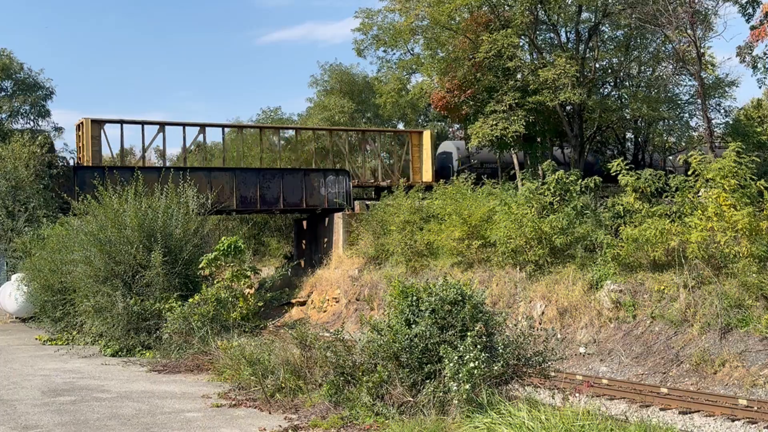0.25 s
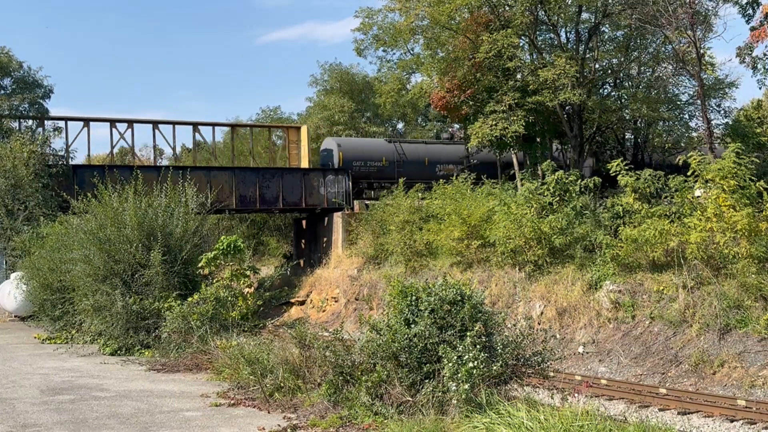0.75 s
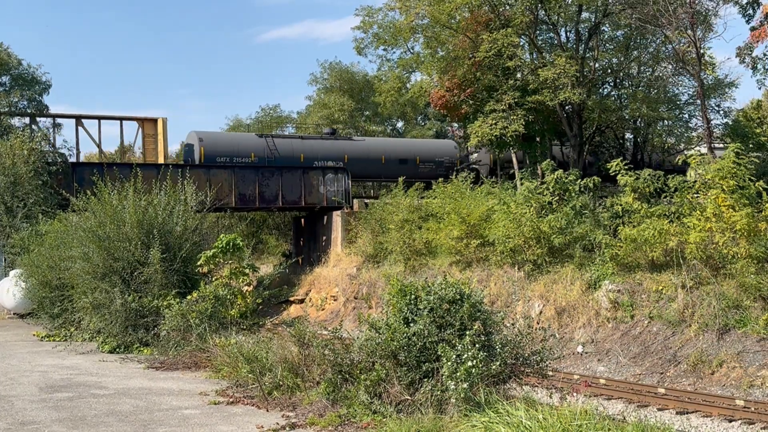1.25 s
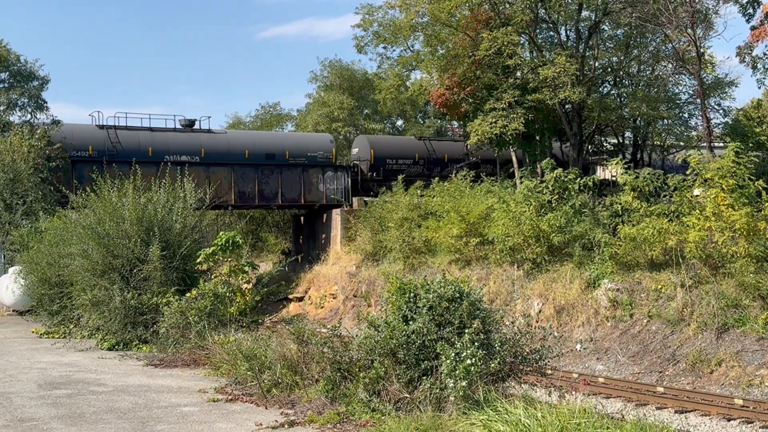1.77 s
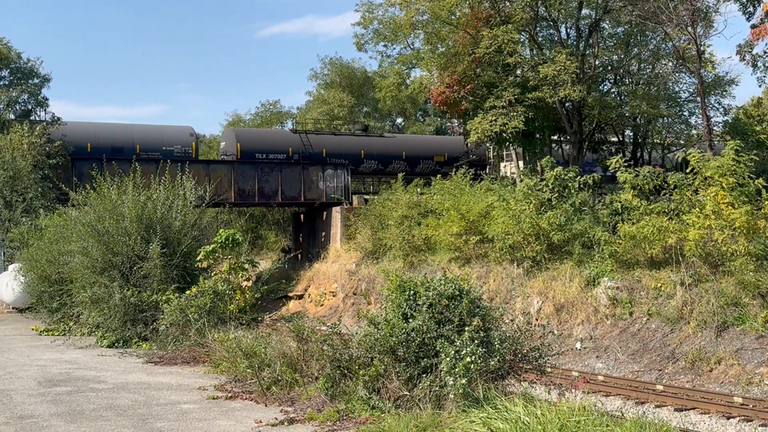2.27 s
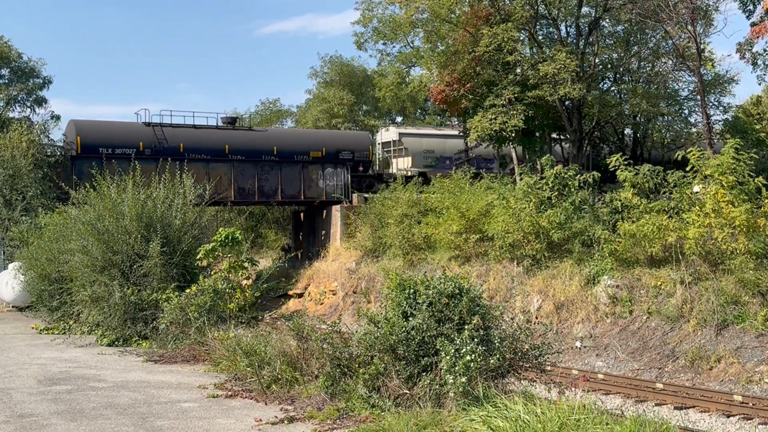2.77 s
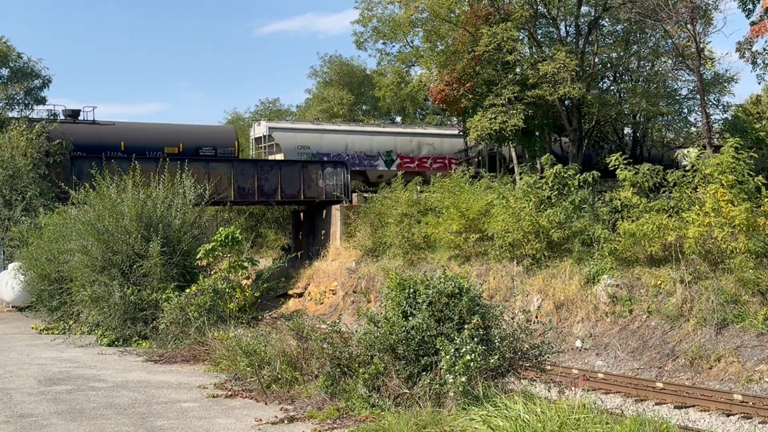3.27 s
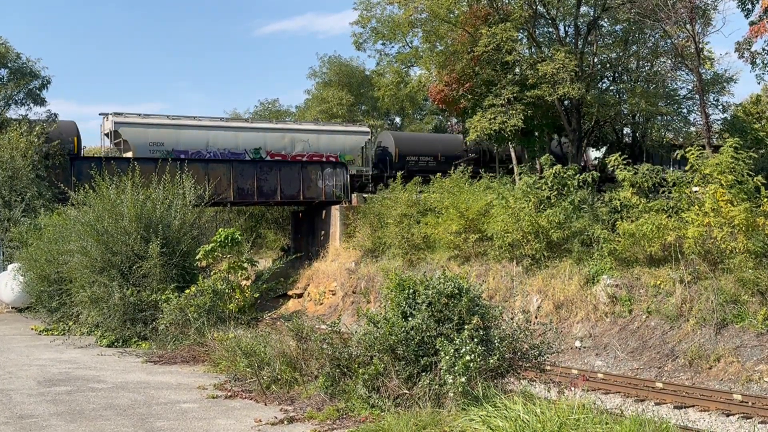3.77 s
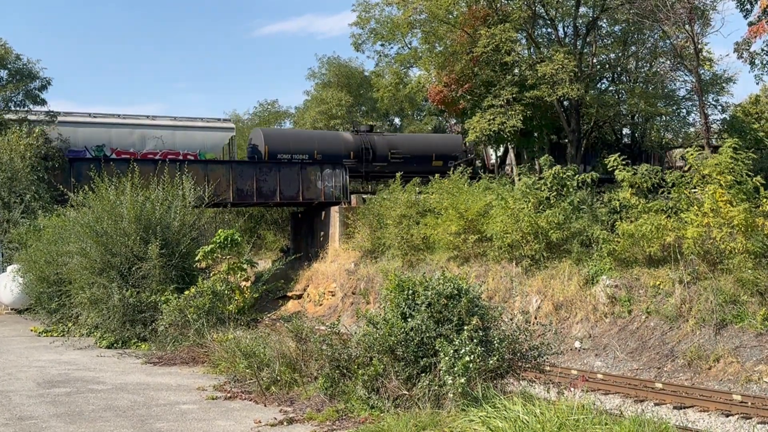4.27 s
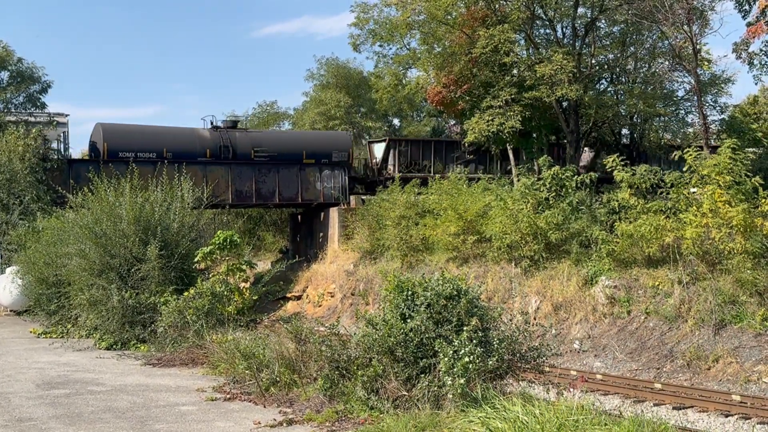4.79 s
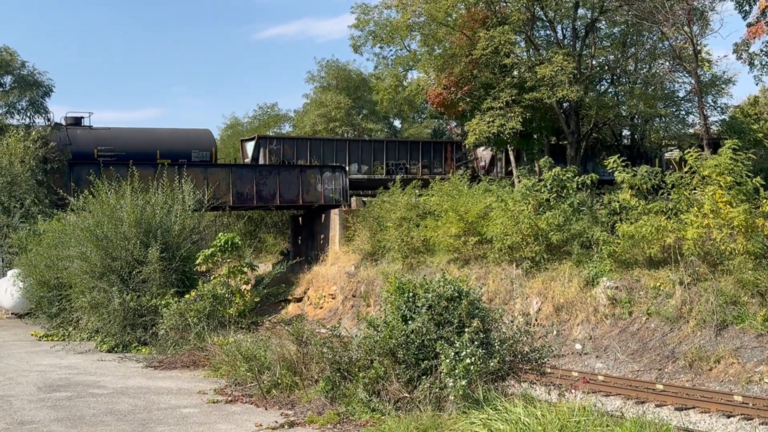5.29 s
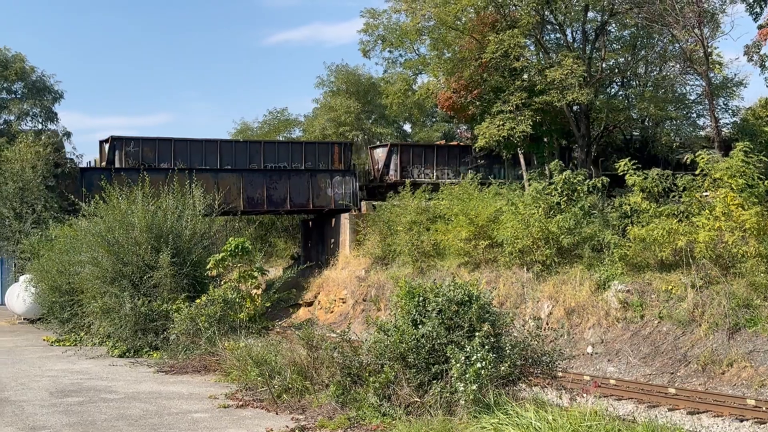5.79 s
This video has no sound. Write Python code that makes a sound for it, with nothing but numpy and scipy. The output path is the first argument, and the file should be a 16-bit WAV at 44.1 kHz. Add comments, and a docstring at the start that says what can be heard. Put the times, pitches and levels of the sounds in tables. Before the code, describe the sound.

Loud, deep boom and roar of freight wagons crossing a steel bridge, with early wheel-flat slams, brief squeals, hollow howls and an approaching engine.

```python
"""Heard in stereo outdoors below the embankment, freight wagons cross a steel girder bridge.
From the start, noise-driven deck, girders, wagon bodies and rails boom, drum and roar; joints thump, wheels clack.
Wheel flats slam early on and again near the end; brief tonal squeals sound in the first 1.4 s and after 4.7 s.
From 1.35 s a girder mode hums, a wavering near-pure tone; after 3.7 s wagons howl in bursts of tonal noise.
A diesel drone, orders of one firing cycle, draws nearer, and its hissing intake emerges late."""
import sys
import numpy as np
from scipy import signal
from scipy.fft import rfft, irfft, next_fast_len
from scipy.io import wavfile
from scipy.ndimage import uniform_filter1d, map_coordinates

SR = 44100
rng = np.random.default_rng(int(sys.argv[2]) if len(sys.argv) > 2 else 0)


def materialize(psi):
    """Save the field psi as 16-bit PCM at rate SR to the path in sys.argv[1].

    A 1-D psi becomes a single channel; in a 2-D psi each row is a channel.
    """
    bounded = np.clip(np.atleast_2d(psi).T, -1, 1)
    quanta = np.round(bounded * 32767).astype(np.int16)
    wavfile.write(sys.argv[1], SR, quanta)


def volts(x):
    """Linear amplitude factor 10**(x/20) for a level x in dB, scalar or array-like."""
    e = np.asarray(x, float) / 20
    return 10 ** e


N = 266364

# radiated colours, relative density: frequency_hz, density_db (per Hz)
DECK_COLOUR = [(15, -40), (25, -3), (60, 1), (108, -1.5), (135, -3), (180, -30.5), (300, -120)]
GIRDER_WEB_COLOUR = [(71, -41.5), (120, -11), (156, 0), (183, -1.5), (237, -2.5), (300, -19), (390, -39),
                     (660, -120)]
WAGON_BODY_COLOUR = [(160, -26), (270, -1), (436, 0), (527, -3.5), (571, -4), (606, -5), (820, -18),
                     (1070, -43.5), (1800, -120)]
RAIL_COLOUR = [(450, -27.5), (760, -0.5), (805, -7), (974, -2.5), (1130, -7), (1360, -9), (1480, -5.5),
               (1680, -9.5), (1900, -9), (2130, -12), (2520, -9.5), (2880, -13.5), (3140, -12), (3600, -18),
               (3920, -15), (4150, -18), (5780, -23.5), (7400, -29.5), (9620, -40.5), (16300, -120)]
FLANGE_COLOUR = [(4180, -34), (7100, -4), (7710, 0), (9080, -2), (10700, -13), (12700, -17), (14400, -27),
                 (15100, -33)]
INTAKE_COLOUR = [(9000, -40), (11500, -9.5), (14000, -1.5), (15100, -2.5), (15300, -43.5)]  # air hiss of the engine's intake
# wheels thumping over joints: start_s, relative level_db, pitch_hz
THUMPS = [(0.2, -7.5, 121.4), (0.21, -8.5, 182), (0.319, -10.5, 201), (0.371, -3.5, 201), (0.58, -9, 100.3),
          (0.685, -3.5, 116), (0.722, -5, 136), (0.772, -8, 182.4), (0.786, -5, 96.5), (0.839, -5, 73.3),
          (0.868, -6.5, 98), (0.943, -9.5, 72.4), (1.019, -4, 171.6), (1.056, -7.5, 90), (1.11, -8.5, 163),
          (1.135, -5, 95.7), (1.169, -6.5, 232.5), (1.195, -6.5, 110), (1.232, -6, 150), (1.25, -12, 88),
          (1.292, -4.5, 100.4), (1.32, -3, 181), (1.39, -10, 117.6), (1.468, -6.5, 185), (1.53, -5, 172),
          (1.601, -7, 218), (1.56, -6.5, 164.7), (1.7, -5.5, 190), (1.785, -3.5, 206), (1.839, -8, 150),
          (1.865, -10, 119.5), (1.957, -6.5, 191.6), (2.047, -9, 178.4), (2.214, -6, 176),
          (2.244, -9.5, 124), (2.283, -2.5, 183), (2.36, -11, 177), (2.417, -5.5, 173.5), (2.468, -14, 178),
          (2.514, -10, 194), (2.569, -10, 165.4), (2.62, -11.5, 201), (2.717, -5.5, 172.6),
          (2.751, -8, 190), (2.779, -3.5, 180), (2.8, -15, 110), (2.876, -10, 179), (2.951, -8.5, 183),
          (3.11, -10.5, 147), (3.129, -16.5, 71.5), (3.22, -12.5, 95.5), (3.329, -12.5, 91),
          (3.439, -8.5, 190), (3.52, -13, 101.6), (3.86, -9.5, 190), (4.01, -12.5, 186), (4.19, -9, 95),
          (4.73, -12.5, 91), (5.049, -11, 200), (5.209, -7.5, 192), (5.501, -9.5, 164), (5.425, -10, 86),
          (5.545, -10, 79.3), (5.639, -5.5, 176.6), (6, -4.5, 100.7)]
# wheel flats slamming the rail: start_s, relative level_db
SLAMS = [(0.685, -5.5), (0.724, -4.5), (0.791, -13.5), (0.871, -12.5), (1.026, -3), (1.061, -0.5),
         (1.172, -7.5), (1.216, -8), (5.49, -11.5), (5.525, -11), (5.547, -8.5), (5.636, -13.5),
         (5.69, -10.5), (5.76, -6)]
# the deck's short answer to a slam: frequency_hz, relative level_db, t60_s
PLATE_MODES = [(190, -4.5, 0.039), (313, 1, 0.032), (430, -0.5, 0.028), (580, -3.5, 0.036),
               (910, -16.5, .02)]
# wheel clacks: start_s, relative level_db
CLACKS = [(0.075, -18.5), (0.1749, -17.5), (0.199, -24.5), (0.232, -12), (0.274, -22), (0.3082, -24),
          (0.35, -23.5), (0.39, -10), (0.432, -16.5), (0.521, -18.5), (0.555, -21.5), (0.6339, -19),
          (2.574, -15), (3.924, -22), (4.3023, -23), (4.776, -23), (4.941, -22.5), (5.16, -24.5),
          (5.478, -20.5), (5.5472, -20), (5.636, -23), (5.68, -23), (5.7, -21), (5.72, -20), (5.754, -19),
          (6.001, -20)]
# what a clack rings with: frequency_hz, relative level_db, t60_s
WHEEL_MODES = [(1301, -1, 0.087), (1514, -1, 0.12), (1868, 1.5, 0.066), (2594, -1, 0.095), (3493, -4, 0.15),
               (4240, -8, 0.017), (5550, -10.5, 0.088)]
# steel modes singing under the rolling: frequency_hz, width_hz, level_db (rms before it follows the load)
SINGING_MODES = [(862.5, 12, -45), (658, 20, -40)]
# diesel drone: time_s, firing_cycle_hz, relative level_db
DIESEL_COURSE = [(0, 29.42, -39.5), (2.5, 29.94, -36.5), (3.5, 29.82, -30.5), (4.5, 29.74, -28.5),
                 (5.5, 29.62, -27.5), (6.04, 29.8, -24.5)]
# drone partials: multiple of the firing cycle, relative level_db
DIESEL_ORDERS = [(2, -7.5), (3, -5), (4, 1.5), (5, -11.5), (6, -10)]
# intake hiss as the engine nears: time_s, level_db (rms)
INTAKE_COURSE = [(0, -88.5), (4, -81.5), (5, -70.5), (5.5, -66.5), (5.85, -61.5), (6.04, -60)]
# stereo image by frequency: frequency_hz, left_minus_right_db, left_lead_rad, likeness of the channels (0-1)
STEREO_IMAGE = [(40, .2, .12, .95), (110, .8, .15, .91), (170, 1.9, .32, .92), (240, 2.1, .22, .94),
                (300, 1.1, .25, .9), (400, 1.5, .14, .96), (500, 3.5, .35, .86), (600, 5.2, -.04, .8),
                (800, 6.9, -.53, .54), (1000, 4.5, -.68, .76), (1300, 1.5, -.74, .9),
                (1500, -.7, -.49, .97), (1750, -.9, -.23, .97), (1880, 0, 0, 1), (2300, 0, .03, 1),
                (2500, -.3, .34, .98), (3000, 0, .53, .97), (4000, .2, .5, .95), (4900, .1, .3, .94),
                (5250, 0, 0, 1), (6800, 0, 0, 1), (7150, 0, 1.1, .85), (7600, 0, 3.1, 1),
                (9550, 0, 3.14, 1), (9650, 0, 2.6, 0.75), (10700, 0, 2.7, 0.7), (13400, 0, 1, .5),
                (15000, 0, 1.5, .65)]
# spells of near-pure girder hum: start_s, end_s (middles of the fades), pitch_hz, level_db (rms before throbbing)
HUM_SPELLS = [(1.35, 1.95, 572, -32), (1.95, 2.35, 571, -35), (2.35, 2.82, 570.5, -32.5),
              (2.82, 3.35, 571, -39), (3.35, 3.8, 570, -35.5), (3.8, 5.05, 568, -31.5),
              (5.05, 5.3, 568, -29.5), (5.4, 5.65, 568, -29.5), (5.75, 6.1, 569, -33.5)]
# howls of hollow wagons: centre_s, length_s, centre pitch_hz, relative level_db
HOWLS = [(3.903, 0.38, 411.6, -21), (4.196, 0.22, 430, -23.5), (4.752, 0.51, 430.7, -23.5),
         (5.394, 0.19, 520.5, -25), (5.506, 0.51, 414.2, -24), (5.764, 0.24, 430.6, -20.5),
         (6.001, 0.23, 407, -25)]
# short flange squeals: start_s (middle of the onset), relative level_db, pitch_hz, length_s
SQUEALS = [(.225, -39, 1850, 0.1), (.39, -41, 2520, .07), (1.29, -43, 2500, .07), (4.73, -42, 1490, .04),
           (4.93, -37.5, 1958, 0.1), (5.39, -45, 2550, .07)]
# how hard the wheels shake the span: time_s, relative level_db
SHAKE_COURSE = [(0.0, -14.5), (0.05, -13), (0.13, -19.5), (0.2, -14.5), (0.52, -15.5), (0.87, -10.5),
                (0.93, -15), (1.16, -11.5), (1.44, -16), (1.46, -15.5), (2.1, -18), (2.19, -17.5),
                (2.24, -18.5), (2.37, -18.5), (2.69, -17.5), (2.79, -19.5), (2.82, -19.5), (4.19, -17),
                (4.27, -18), (5.99, -13), (6.01, -10), (6.04, -13.5)]
# loads taking over the span: arrival_s (middle of handover), deck_db, web_db, body_db over the shaking
WAGONS = [(0, -4, -3.5, -5.5), (.6, -5.5, -8, -8), (1.42, -9, -5.5, -8.5), (2.1, -11.5, -5.5, -7.5),
          (3.05, -4, -3, -6.5), (3.75, -5, -6.5, -6.5), (4.25, -6, -7, -5), (5.3, -5, -7.5, -5.5)]
# bogies swelling the rail roar: centre_s, length_s, roar_db, brightness_db
BOGIES = [(0.098, 0.057, 6, -3), (0.382, 0.8, 2.5, 0.5), (1.092, 0.24, 0.5, 0), (1.397, 0.45, 1, 0),
          (2.277, 0.28, -1.5, 4), (2.604, 0.79, 3, -2), (3.422, 0.74, 2, 1), (3.714, 0.23, 1, -0.5),
          (3.947, 0.31, 3, -1), (4.5, 1, 1, 1.5), (5.002, 0.35, 0.5, 2), (5.718, 0.77, 2.5, 0.5),
          (5.735, 0.17, 2, -3), (6.0, 0.67, -0.5, 2)]
# flanges rubbing the rail head: centre_s, length_s, level_db over the steady hiss
RUBS = [(0.603, 3.4, 3), (2.127, .15, 6), (2.268, .15, 7.5), (2.502, 0.68, 5.5), (3.497, 0.65, 3),
        (4.718, 0.45, 4.5), (5.849, 0.61, 6.5)]
# brief dips of the rumble: centre_s, length_s, level_db change
LULLS = [(0.647, 0.08, -0.5), (0.81, 0.036, -0.5), (0.983, 0.11, -2), (1.42, 0.055, -3), (1.763, 0.071, -3),
         (2.19, .06, -2), (2.666, 0.055, -3.5), (3.427, 0.074, -2.5), (4.542, 0.18, -2.5)]

HANDOVER_S = 0.48  # one wagon yields to the next
ROAR_FOLLOWS = 0.35  # share of the shaking, in dB, that roar and rattles follow


def unit(x):
    """x at rms 1."""
    return x / np.sqrt(np.mean(x ** 2) + 1e-20)


def along(f, v, hz):
    """Values v at f, read on a log axis."""
    return np.interp(np.log(hz + 1), np.log(np.asarray(f) + 1), v)


def curves(rows):
    """One value per sample for each column after the time."""
    s, *cols = np.transpose(rows)
    return [np.interp(np.arange(N) / SR, s, c) for c in cols]


def swell(centre_s, length_s):
    """A smooth rise and fall from 0 to 1 and back."""
    return np.cos(np.pi * np.clip((np.arange(N) / SR - centre_s) / length_s, -.5, .5)) ** 2


def step(at_s, width_s):
    """A smooth change from 0 to 1, centred on at_s."""
    return np.sin(np.pi / 2 * np.clip((np.arange(N) / SR - at_s) / width_s + .5, 0, 1)) ** 2


def wobble(rate):
    """A smooth random curve, rate knots a second."""
    knots = rng.standard_normal(int(N * rate / SR) + 4)
    return map_coordinates(knots, [np.arange(N) * rate / SR])


def filtered(x, response):
    """x times a complex response of frequency; mirrored ends keep the edges clean."""
    pad = 2048
    x = np.pad(x, [(0, 0), (pad, pad)], mode="reflect")
    m = next_fast_len(x.shape[1] + SR // 2)
    return irfft(rfft(x, m) * response(np.fft.rfftfreq(m, 1 / SR)), m)[:, pad:pad + N]


def rush(spectrum, patchy_db):
    """Two unrelated noises of one colour and rms 1, with shared patches of random gain."""
    z = signal.stft(rng.standard_normal((2, N + 512)), nperseg=512)[2]
    field = uniform_filter1d(rng.standard_normal(z.shape[1:]), size=5, axis=0)  # across frequency
    field = uniform_filter1d(field, size=12, axis=1)  # across time
    pair = signal.istft(z * volts(patchy_db * unit(field)), nperseg=512)[1][:, :N]
    return unit(filtered(pair, lambda hz: volts(along(*np.transpose(spectrum), hz))))


def tone(hz, waver_hz, rate):
    """A sine pair of rms 1, a quarter cycle apart, whose pitch wavers."""
    phase = 2 * np.pi * np.cumsum(hz + waver_hz * wobble(rate)) / SR
    return np.sqrt(2) * np.array([np.sin(phase), np.cos(phase)])


def load():
    """Deck, web and body levels in dB: the shaking, shared out by the wagon on the span."""
    s, *parts = np.transpose(WAGONS)
    steps = np.array([step(at, HANDOVER_S) for at in s[1:]])
    lulls_db = sum(db * swell(at, length) for at, length, db in LULLS)
    shake_db = curves(SHAKE_COURSE)[0] + lulls_db
    return [shake_db + db[0] + np.diff(db) @ steps for db in parts]


def roar_follow_db():
    """The part of the shaking, about its mean, that roar and rattles follow."""
    shake_db = curves(SHAKE_COURSE)[0]
    return ROAR_FOLLOWS * (shake_db - shake_db.mean())


def diesel():
    """Low orders of an engine's firing cycle, slightly unsteady; its intake hiss emerges as it nears."""
    hz, db = curves(DIESEL_COURSE)
    phase = 2 * np.pi * np.cumsum(hz * (1 + 0.0037 * wobble(3.01))) / SR
    drone = 0
    for k, level in DIESEL_ORDERS:
        start_phase = rng.uniform(0, 2 * np.pi, (2, 1))
        drone = drone + volts(level + 0.59 * wobble(6.1)) * np.sin(k * phase + start_phase)
    hiss = volts(curves(INTAKE_COURSE)[0]) * rush(INTAKE_COLOUR, patchy_db=2.5)
    return volts(db) * np.sqrt(2) * drone + hiss


def squeals():
    """A flange sticks and slips briefly: a rough tone that sets in and stops quickly."""
    edge_s, flutter_db, waver_hz = 0.044, 2, 7
    out = 0
    for s, db, hz, length in SQUEALS:
        gate = step(s, edge_s) - step(s + length, edge_s)
        out = out + volts(db + flutter_db * wobble(60)) * gate * tone(hz, waver_hz, rate=60)
    return out


def howl():
    """Hollow wagons howl: a noise band around each burst's centre pitch, swelling and fading."""
    # random curves carried on a tone pair make noise bands
    band = unit(np.array([wobble(160) for _ in range(4)])).reshape(2, 2, N)
    out = 0
    for s, length, hz, db in HOWLS:
        burst = (band * tone(hz, 3.02, rate=8)).sum(axis=1) / np.sqrt(2)
        out = out + volts(db - 3.0) * np.sqrt(swell(s, length)) * burst
    return out


def hum():
    """The girder's near-pure mode, its level throbbing irregularly."""
    edge_s, throb_db = 0.15, 2.5
    throb = volts(throb_db * wobble(8.7))
    out = 0
    for start, end, hz, db in HUM_SPELLS:
        gate = step(start, edge_s) - step(end, edge_s)
        out = out + volts(db) * gate * tone(hz, 1.43, rate=15)
    return throb * out


def singing():
    """Lightly damped steel modes, kept ringing by noise whose level follows the load on the wagon bodies."""
    body = load()[2]

    def mode(c, w):
        """White noise through one resonance at c, w wide, both in Hz."""
        resonance = lambda f: 1j * f * w / (c * c - f * f + 1j * f * w)
        return unit(filtered(rng.standard_normal((2, N)), resonance))

    modes = sum(volts(db) * mode(hz, width) for hz, width, db in SINGING_MODES)
    return volts(0.77 * (body - body.mean())) * modes


def rattles():
    """Loose gear rattling all along: random small clacks, harder when the span shakes harder."""
    per_s, mean_db, spread_db = 70, -28, 6  # levels on the clacks' scale, spread from least to most
    draw = rng.random((int(per_s * N / SR), 2))
    s = draw[:, 0] * (N - 1) / SR
    db = mean_db + spread_db * (draw[:, 1] - .5) + roar_follow_db()[(s * SR).astype(int)]
    return list(zip(s, db))


def clacks():
    """Wheels and loose gear clack in the wheel's modes, smeared by echoes from the girders."""
    out, t = np.zeros((2, N + SR)), np.arange(SR // 16) / SR
    hz, mode_db, t60 = np.transpose(WHEEL_MODES)[..., None]
    envelope = (1 - np.exp(-t / 0.0013)) * (1 - t / t[-1])
    for s, db in CLACKS + rattles():
        # a noisy phase stands for the echoes
        drift = np.cumsum(rng.normal(0, 0.1, (2, len(WHEEL_MODES), len(t))), axis=2)
        level = mode_db + rng.normal(0, 1.7, mode_db.shape)
        ring = volts(level - 60 * t / t60) * np.sin(2 * np.pi * hz * t + drift)
        out[:, round(s * SR):][:, :len(t)] += volts(db - 12.0) * envelope * ring.sum(axis=1)
    return out[:, :N]


def slams():
    """A wheel flat slams the rail and the deck plate answers in short modes, direct sound only."""
    out, t = np.zeros((2, N + SR)), np.arange(SR // 4) / SR
    ring = sum(volts(level - 60 * t / t60) * np.sin(2 * np.pi * hz * t) for hz, level, t60 in PLATE_MODES)
    for s, db in SLAMS:
        out[0, round(s * SR):][:len(t)] += volts(db - 4.0) * (1 - np.exp(-t / 0.0013)) * ring
    return out[:, :N]


def thumps():
    """A joint thumps the girder at its pitch, with an overtone and a knock, direct sound only."""
    out, t = np.zeros((2, N + SR)), np.arange(SR // 4) / SR
    knock = 0.71 * volts(-60 * t / 0.022) * np.sin(2 * np.pi * 520 * t)  # of the rail end
    for s, db, hz in THUMPS:
        overtone = 0.23 * volts(-60 * t / 0.06) * np.sin(2 * np.pi * 1.6 * hz * t)
        ring = np.sin(2 * np.pi * hz * t) + overtone + knock
        # lower thumps ring longer: a set number of cycles
        decay = volts(db - 1.2 - 60 * t / (18 / hz))
        out[0, round(s * SR):][:len(t)] += decay * (1 - np.exp(-t / 0.0024)) * ring
    return out[:, :N]


def joints():
    """Clacks, slams and thumps together; distance dulls their edge."""
    return filtered(clacks() + slams() + thumps(), lambda f: 1 / (1 + 1j * f / 6500) ** 4)


def wagon_bodies():
    """Drumming body noise whose low panels drum less once hollow wagons take the span."""
    below_hz, panels_db, drop_db, hollow_from_s = 337, 3, -6, 3.8
    wagon = rush(WAGON_BODY_COLOUR, patchy_db=1.0)
    panels = filtered(wagon, lambda hz: 1 / (1 + (hz / below_hz) ** 8))
    return wagon + (volts(panels_db + drop_db * step(hollow_from_s, HANDOVER_S)) - 1) * panels


def rail_roar(flutter):
    """Rough wheels roar on the rails, changing in level and brightness as each bogie passes."""
    lower_db = -31.5 + roar_follow_db() + sum(db * swell(s, length) for s, length, db, _ in BOGIES)
    upper_db = -0.5 + sum(db * swell(s, length) for s, length, _, db in BOGIES)
    roar = rush(RAIL_COLOUR, patchy_db=0.63)
    upper = filtered(roar, lambda hz: 1 / (1 + (2250 / (hz + 1)) ** 6))
    return volts(lower_db + 0.53 * flutter) * (roar - upper + volts(upper_db) * upper)


def flange_hiss(flutter):
    """Flanges hiss along the rail head, swelling at each rub."""
    db = -56 + sum(level * swell(s, length) for s, length, level in RUBS)
    return volts(db + 1.1 * flutter + 1.2 * wobble(18.0)) * rush(FLANGE_COLOUR, patchy_db=1.8)


def rolling():
    """Rough wheels shake deck, webs, bodies and rails; levels waver at random, one flutter shared by all but the deck."""
    deck_db, web_db, body_db = load()
    flutter = wobble(9)
    deck = volts(deck_db + 0.99 * wobble(5.7)) * rush(DECK_COLOUR, patchy_db=0.5)
    web = volts(web_db + flutter) * rush(GIRDER_WEB_COLOUR, patchy_db=0.9)
    body = volts(body_db - 0.88 + 0.85 * flutter) * wagon_bodies()
    return deck + web + body + rail_roar(flutter) + flange_hiss(flutter)


def scene():
    """Row 0 is the direct sound, row 1 its scattered twin."""
    return diesel() + squeals() + howl() + hum() + singing() + joints() + rolling()


def low_pass(x):
    """Removes everything above the highest recorded frequency."""
    return signal.sosfilt(signal.butter(12, 15490, fs=SR, output="sos"), x)


def record(dry):
    """Stereo image by frequency: direct plus or minus scattered sound sets level, lead and likeness of the channels."""
    f, level_db, lead_rad, likeness = np.transpose(STEREO_IMAGE)

    def channel(sign):
        """One channel's mix: +1 left, -1 right."""
        def response(hz):
            """Gain and lead times the shares of direct and scattered sound."""
            turn = np.arccos(np.clip(along(f, likeness, hz), 0, 1)) / 2
            gain = volts(sign * along(f, level_db, hz) / 2)
            lead = np.exp(.5j * sign * along(f, lead_rad, hz))
            return gain * lead * [np.cos(turn), sign * np.sin(turn)]

        return filtered(dry, response).sum(axis=0)

    pair = np.array([channel(1), channel(-1)])
    pair = filtered(pair, lambda hz: 1 / (1 + (36 / (hz + 1)) ** 6))  # bass roll-off
    pair = pair / (1 + np.abs(pair / .95) ** 6) ** (1 / 6)  # soft clipping
    edge_s = np.minimum(np.arange(N), np.arange(N)[::-1]) / SR
    pair = pair * np.sin(np.pi / 2 * np.clip(edge_s / .003, 0, 1)) ** 2  # brief fades
    return low_pass(pair)


dry = scene()
out = record(dry)
materialize(out)
```